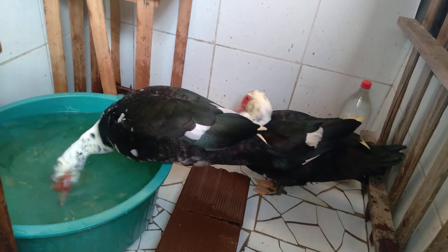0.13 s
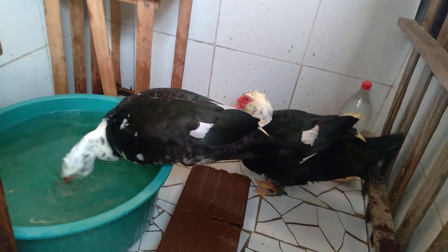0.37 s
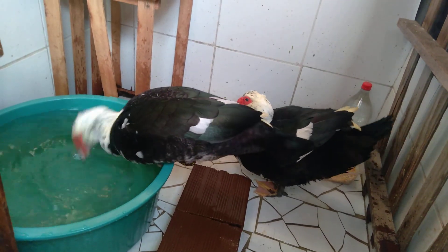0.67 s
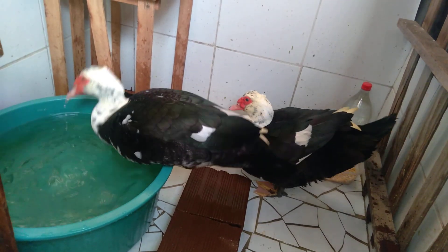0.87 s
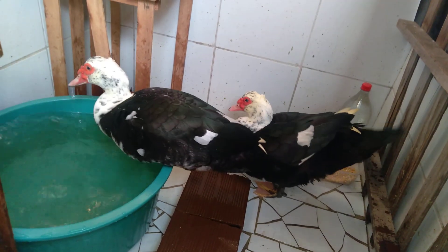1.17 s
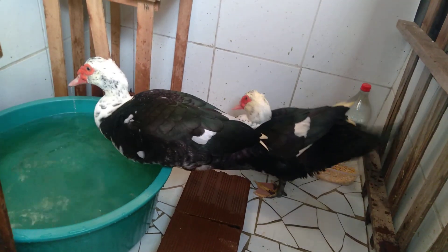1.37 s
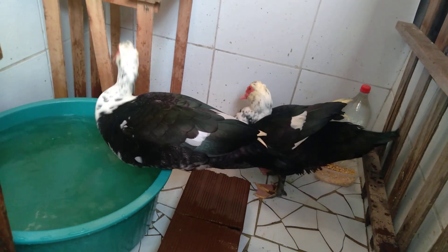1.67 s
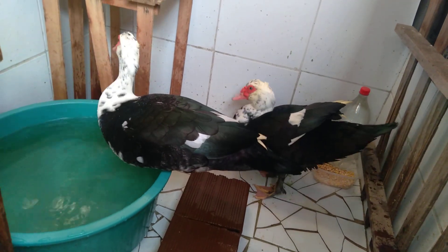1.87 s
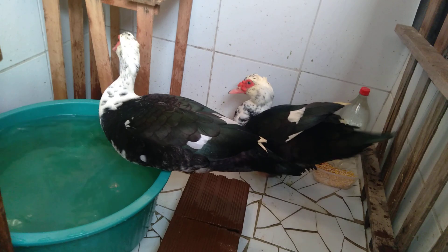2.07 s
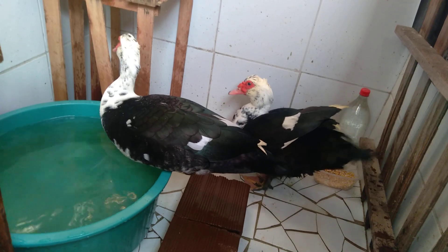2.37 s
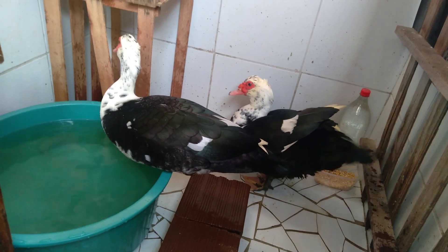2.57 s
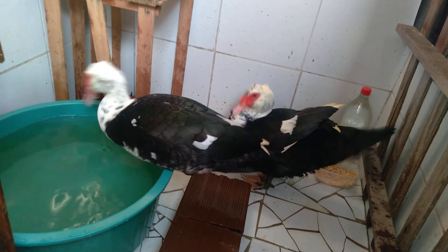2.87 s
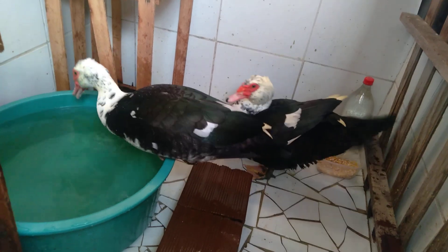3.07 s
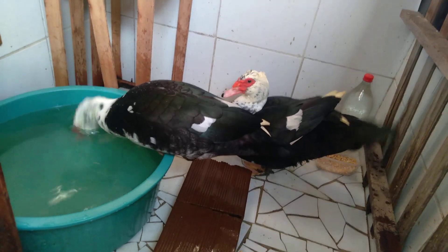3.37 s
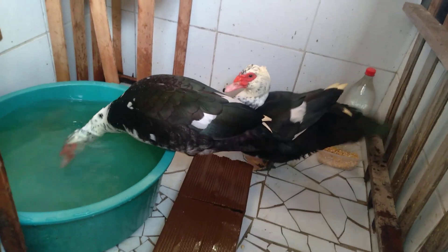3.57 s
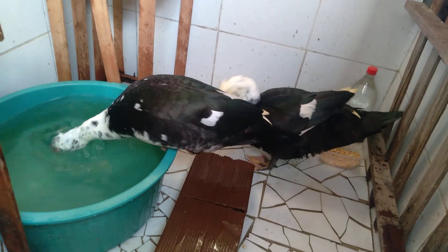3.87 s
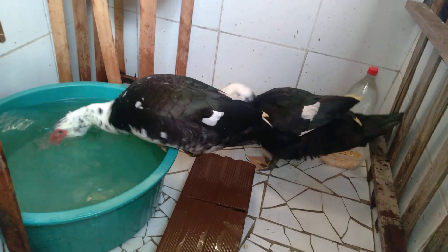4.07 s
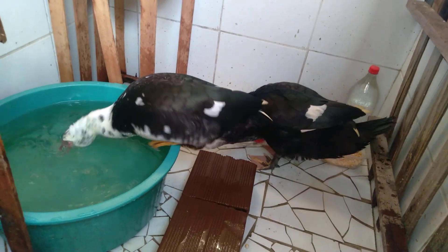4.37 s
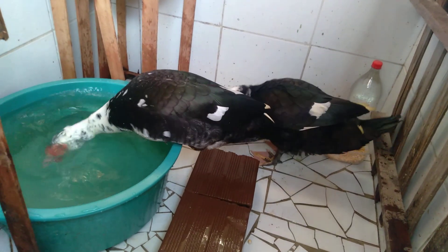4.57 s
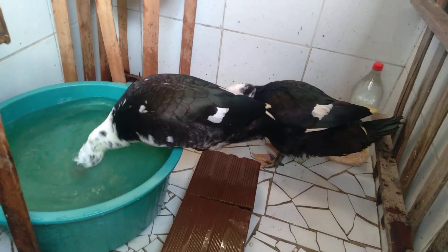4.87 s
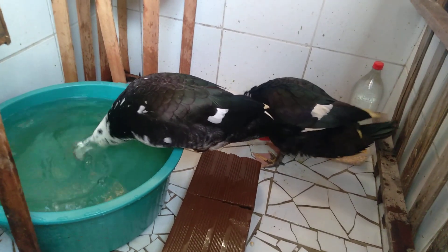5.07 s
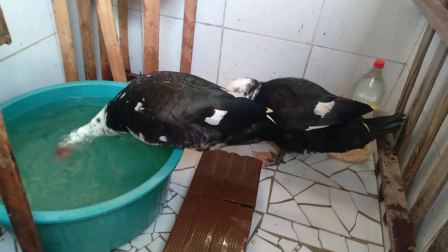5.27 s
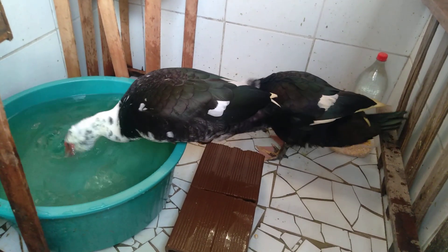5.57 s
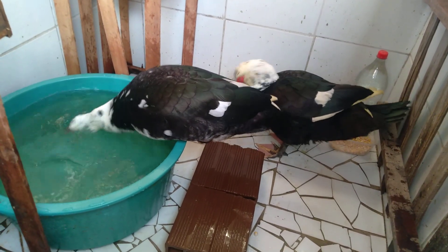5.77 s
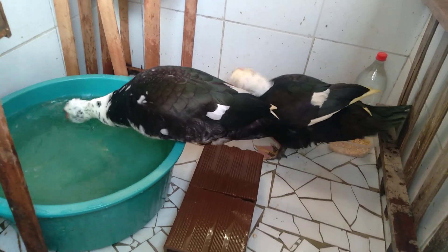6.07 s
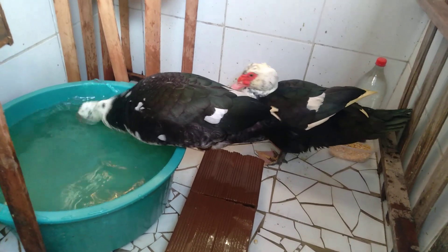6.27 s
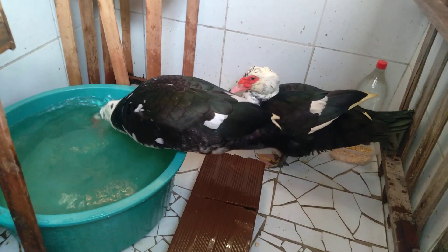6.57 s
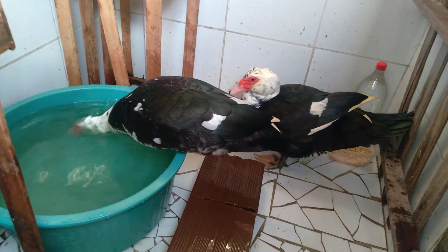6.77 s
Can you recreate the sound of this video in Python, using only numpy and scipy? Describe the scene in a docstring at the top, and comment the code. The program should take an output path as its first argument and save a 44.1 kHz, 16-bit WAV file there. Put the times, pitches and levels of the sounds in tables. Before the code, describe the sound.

A duck dabbles in a plastic tub in a small tiled corner. Sharp drips and fizzing tiny bubbles come with hoarse huffs and thin wheezes during the first three seconds. The water nearly calms, then splashes return louder and irregular until the end, with a few lower plops. Soft hollow hoots recur slowly over low rumble. Close mono sound with short tile echoes and brief level dips.

```python
"""A duck dabbles in a plastic tub of water in a small tiled corner, with hoarse huffs and thin wheezes early on.
Drops crack, ring and spray; larger bubbles ring lower, over a fizz of tiny pings and hiss.
The huffs and wheezes are shaped noise, and two late sloshes ring the tub as wavering narrow noise.
A soft hollow hoot made of three tones recurs every 1.1 to 1.4 seconds, above low room noise.
The duck and water echo off the tub and tiles, and their level dips briefly now and then."""
import sys
import numpy as np
from scipy import signal
from scipy.fft import rfft, irfft
from scipy.io import wavfile
from scipy.ndimage import map_coordinates

SR = 44100
rng = np.random.default_rng(int(sys.argv[2]) if len(sys.argv) > 2 else 0)


def transcribe(u):
    """Save the signal u as a 16-bit wav file named by the first command-line argument.

    u: samples, shape (n,) or (channels, n), limited to [-1, 1]; the rate is SR.
    q: integer samples, one column per channel.
    """
    v = np.clip(np.atleast_2d(u).T, -1, 1)
    q = np.round(v * 32767).astype(np.int16)
    wavfile.write(sys.argv[1], SR, q)


N = 305613
TIME = np.arange(N) / SR   # s


# the loudest drops and bill smacks; levels are relative, before the gains in drops():
# (time [s], level [dB], starting bubble pitch [Hz], bright splash level [dB])
LOUD_DROPS = [(0.062, -19.5, 5010, -63), (0.1118, -19.5, 4500, -54), (0.2372, -19.5, 8400, -36),
              (0.364, -23, 6220, -48), (0.841, -16, 4490, -36), (0.8637, -13.5, 4650, -39),
              (1.1286, -18.5, 4540, -41), (1.1556, -18, 11600, -45), (1.2043, -18, 8970, -27.5),
              (1.27, -24, 10100, -36), (1.3917, -17, 5040, -28.5), (1.4216, -18, 4710, -31),
              (2.0921, -26, 4500, -43.5), (2.114, -24.5, 4670, -38), (2.223, -11, 4430, -31),
              (3.5535, -23, 6750, -41), (3.6113, -20.5, 4640, -30), (3.7499, -19.5, 7860, -31.5),
              (3.8472, -7.5, 8000, -27), (3.895, -17.5, 5230, -45), (4.0415, -16, 5000, -44),
              (4.072, -9, 7630, -32), (4.1863, -8, 4290, -34), (4.2672, -12.5, 4600, -36),
              (4.3802, -18, 4690, -41), (4.6478, -25, 5420, -45), (4.814, -25.5, 4620, -34),
              (4.92, -17, 5170, -55.5), (5.0862, -5.5, 5120, -31), (5.1277, -18, 4630, -35),
              (5.1975, -12, 6470, -38), (5.236, -19.5, 4800, -33.5), (5.3037, -14.5, 4620, -49),
              (5.403, -17, 6780, -41), (5.4814, -8.5, 4800, -37.5), (5.619, -16, 8300, -33),
              (5.6694, -15, 7000, -36), (5.771, -19.5, 4440, -65), (5.808, -18, 8170, -46),
              (5.9437, -23.5, 5240, -48), (6.099, -21.5, 5300, -40), (6.132, -16.5, 5090, -37),
              (6.1802, -18, 5500, -38), (6.3356, -19.5, 4980, -33), (6.5349, -21, 4820, -40),
              (6.7473, -26, 4950, -38), (6.8139, -24, 5650, -67)]


def drops(cycles=12.7, rise_per_s=11.6, crack=0.71, crack_s=0.0004, spray_s=0.0095, spray_tail=0.25,
          spray_gain=0.066, splash_gain=0.28, droplet_splash_db=-20, level_db=-2.0,
          follower_db=-12.0, follow_s=.022):
    """Each drop cracks the surface, traps a bubble, throws a short spray and is followed by smaller droplets."""
    out, t = np.zeros(N), TIME[:2048]
    droplets = strays(per_s=10, above_db=14.5, low_hz=4276, high_hz=7450)
    droplets = [(s, db, hz, db + droplet_splash_db) for s, db, hz in droplets]
    for s, db, hz, splash_db in list(LOUD_DROPS) + droplets:
        burst = crack * np.exp(-t / crack_s) + np.exp(-t / spray_s) + spray_tail * np.exp(-t / 0.0059)
        spatter = burst * rng.standard_normal(len(t)) * from_db(4.6 * drift(t, 940))
        # the spray has little below the pitch of the main bubble
        spray = band(spatter, min(hz * 0.73, 5200), hz * 1.56, order=5)
        body = bubble(hz, cycles, rise_per_s) + spray_gain * rms_one(spray)
        add(out, s, from_db(db + level_db) * body)
        add(out, s, from_db(splash_db) * splash_gain * rms_one(band(spatter, 8200, 13700)))
        # three smaller droplets follow, weaker the later they land
        for late, higher in rng.random((3, 2)):
            follower = bubble(hz * 1.15 ** higher, cycles, rise_per_s)
            add(out, s + 0.0025 + follow_s * late, from_db(db + follower_db - 3.1 * late) * follower)
    return out


# tone colour of the fizz: (frequency [Hz], gain [dB])
FIZZ_SPECTRUM = [(880, -83), (1500, -48), (1720, -21.5), (2060, -33), (2250, -19.5), (3770, -13),
                 (4590, 0.5), (11400, -9.5), (16000, -17.5)]


def fizz(per_s=950, level_db=0.5, spread_db=7.0, cycles=46.0, rise_per_s=9.2, hiss_db=-9.0, lumps_db=3.0):
    """Countless small bubbles burst round the bill, from dry ticks to clear pings, over a lumpy hiss."""
    pings = np.zeros(N)
    draws = rng.random((9000, 5))
    happens = draws[:, 4] < per_s * TIME[-1] / len(draws)
    for when, pitch, size, damping, _ in draws[happens]:
        hz = 2700 * 5.8 ** pitch
        ringing = cycles / 16 ** damping
        loudness_db = spread_db * min(-np.log(1 - size), 3.6)
        strength = from_db(loudness_db) * hz / np.sqrt(ringing)   # short bursts start louder
        add(pings, when * TIME[-1], strength * bubble(hz, ringing, rise_per_s))
    hiss = coloured(rng.standard_normal(N), FIZZ_SPECTRUM) * from_db(hiss_db + lumps_db * drift(TIME, 89))
    return (coloured(pings, FIZZ_SPECTRUM) + hiss) * from_db(level_db + stirring_db(TIME))


# the loudest large bubbles; levels are relative, before the gain in plops():
# (time [s], level [dB], starting pitch [Hz], time to fade by 60 dB [s])
LARGE_BUBBLES = [(.111, -35, 1810, 0.1), (1.394, -20.5, 1112, 0.062), (1.47, -41, 524, 0.12),
                 (3.519, -49, 324, 0.18), (3.55, -36, 1696, 0.076), (3.795, -36.5, 1270, 0.16),
                 (3.893, -24.5, 1738, 0.095), (4.066, -32, 1675, 0.34), (4.134, -29.5, 1875, 0.13),
                 (4.187, -11, 1860, 0.031), (4.255, -21, 1187, 0.085), (4.852, -33.5, 2166, 0.11),
                 (4.969, -30.5, 2220, 0.043), (5.086, -18.5, 3010, 0.046), (5.118, -19, 3230, 0.1),
                 (5.184, -34, 1757, 0.12), (5.302, -19.5, 2123, 0.069), (5.48, -34, 1640, 0.14),
                 (6.056, -34.5, 2910, 0.17), (6.28, -37, 3200, 0.14), (6.319, -28.5, 2774, 0.14),
                 (6.653, -38, 255, .09), (6.742, -33.5, 925, 0.21), (6.813, -33, 880, 0.1),
                 (6.813, -43, 400, 0.29), (6.859, -18, 972, 0.081), (6.875, -20.5, 1784, 0.089)]


def plops(rise_per_s=2.03, churn=0.6, level_db=-9.0, small_t60_s=.07):
    """Bigger bubbles ring lower and longer, in a little churning water."""
    out, t = np.zeros(N), TIME[:8192]
    small = strays(per_s=4, above_db=-1, low_hz=1683, high_hz=3346)
    for s, db, hz, t60 in list(LARGE_BUBBLES) + [(*row, small_t60_s) for row in small]:
        tone = np.sin(2 * np.pi * hz * t * (1 + rise_per_s * t / 2))
        water = rms_one(band(rng.standard_normal(len(t)), hz, hz * 1.56))
        fade = from_db(db + level_db - 60 * t / t60)
        onset = 1 - np.exp(-t / 0.0029)
        add(out, s, fade * onset * (tone + churn * water))
    return out


# water sloshes against the tub: (time [s], length [s], level [dB])
SLOSH_EVENTS = [(5.448, 0.39, -57), (5.983, 0.16, -56)]
# hollow tones of the tub: (frequency [Hz], width [Hz], relative level [dB])
TUB_TONES = [(486, 70, 1), (973, 80, -6), (1286, 130, -8.5), (2285, 270, -11)]


def sloshes(lapping_db=3.5):
    """Each slosh swells and fades, lapping unevenly against the tub and ringing its hollow tones."""
    ringing = np.zeros(N)
    for hz, width_hz, db in TUB_TONES:
        ringing += from_db(db + lapping_db * drift(TIME, 17)) * narrow_noise(hz, width_hz)
    return swells(SLOSH_EVENTS) * ringing


# hoarse breaths; levels are relative, before the shaping in huffs():
# (time [s], attack [s], release [s], rush level [dB], throat level [dB], bright edge level [dB],
#  throat pitch [Hz])
HUFF_EVENTS = [(.373, 0.092, 0.025, -24, -52, -38, 1210), (.634, 0.082, 0.071, -18, -51.5, -32, 1260),
               (.936, 0.088, 0.073, -29, -43.5, -65, 930), (1.555, 0.11, 0.083, -32.5, -42.5, -63, 1080),
               (1.832, 0.11, 0.13, -24, -46, -60, 1180), (2.172, 0.13, 0.077, -20, -44.5, -32.5, 1270),
               (2.37, 0.19, 0.17, -50.5, -43.5, -75, 1040), (2.588, 0.057, 0.13, -30, -43.5, -46, 1107),
               (2.887, .058, 0.14, -22.5, -40, -37, 1014), (3.207, 0.11, 0.12, -19, -43, -35.5, 1260)]
# tone colour of the rushing air: (frequency [Hz], gain [dB])
HUFF_SPECTRUM = [(350, -65), (600, -20), (748, -16.5), (1390, -9.5), (1590, -12.5), (2270, -16.5),
                 (2540, -11), (4650, 0), (8390, -21), (10300, -44), (16000, -70)]


def huffs(flutter_db=2.47, beak_hz=3880, beak_db=-10.0, second_ratio=1.08, beak_width_hz=160, ends_db=19.0,
          roundness=2.03, cavity_width_hz=130, cavity_db=6.0, glide=.045, opening_db=8.0, edge_focus_db=3.0):
    """Air rushes through the opening bill: rough noise rings the beak, the throat and many small cavities."""
    out = np.zeros(N)
    for start, attack, release, level, throat, edge, throat_hz in HUFF_EVENTS:
        peak, end = start + attack, start + attack + release
        t = TIME[int(start * SR):int(end * SR)]
        stage = np.interp(t, [start, peak, end], [-1, 0, 1])
        air = rng.standard_normal(size=16384)
        # the cavities change with each posture of the head and slide as it moves
        cavities = np.geomspace(1800, 12500, num=18) * np.exp(0.036 * rng.standard_normal(size=18))
        rings = sum((-1) ** k * resonance(air, hz, cavity_width_hz) for k, hz in enumerate(cavities))
        reading_points = np.cumsum(1 + glide * drift(TIME[:len(air)], 14))
        rings = map_coordinates(rings, [reading_points], mode="mirror")
        air = rng.standard_normal(size=16384) + from_db(cavity_db) * rms_one(rings)
        air = coloured(air, HUFF_SPECTRUM)[:len(t)]
        rush = band(air, 1867, 7860, order=4)
        beak = resonance(rush, beak_hz, beak_width_hz) + resonance(rush, beak_hz * second_ratio, beak_width_hz)
        sound = from_db(level) * rms_one(rush + from_db(beak_db) * beak)
        # the throat comes through as the bill opens
        throat_air = rms_one(band(air, throat_hz * 0.79, throat_hz * 1.195, order=3))
        sound += from_db(throat + opening_db * stage) * throat_air
        # the bright edge needs the strongest flow
        edge_air = rms_one(band(rng.standard_normal(len(t)), 8540, 11400))
        sound += from_db(edge - edge_focus_db * stage ** 2) * edge_air
        ends = np.clip(np.minimum(t - t[0], t[-1] - t) / 0.015, 0, 1)
        shape_db = -3.0 - ends_db * np.abs(stage) ** roundness + flutter_db * drift(t, 130)
        add(out, start, sound * ends * from_db(shape_db))
    return out


# thin wheezes of the duck: (time [s], length [s], level [dB])
WHEEZE_EVENTS = [(.235, 0.098, -43.5), (.482, 0.23, -48.5), (1.128, 0.13, -48.5)]


def wheezes():
    """Air squeezes through the nearly closed bill and becomes a narrow, wavering hiss."""
    return swells(WHEEZE_EVENTS) * narrow_noise(hz=3604, width_hz=660)


# hoots: (time [s], low tone level [dB], main tone level [dB], upper tone level [dB])
HOOT_EVENTS = [(1.349, -31.5, -25.5, -45.5), (2.532, -35.5, -42, -33), (3.904, -32, -23, -40),
               (5.043, -35, -26, -47.5), (6.398, -29.5, -25, -58)]
# the low, main and upper tone of every hoot: (centre pitch [Hz], delay [s], length [s])
HOOT_PARTS = [(206, .003, .062), (865, 0.0, .052), (1790, 0.0, .045)]


def hoots(linger_db=-11.5, linger_t60=0.26, waver=0.013):
    """Three unrelated tones swell and fade almost together, then linger unevenly between the walls."""
    out, t = np.zeros(N), TIME[:16384]
    for s, *levels in HOOT_EVENTS:
        for db, (hz, delay, length) in zip(levels, HOOT_PARTS):
            progress = np.minimum(t / length, 1)
            swell = np.sin(np.pi * progress) ** 2
            phase = 2 * np.pi * np.cumsum(hz * (1 + waver * drift(t, 113))) / SR
            echo = drift(t, 78.6) * np.sin(phase) + drift(t, 71.8) * np.cos(phase)
            echo *= progress ** 2 * from_db(linger_db - 60 * np.maximum(t - length, 0) / linger_t60)
            add(out, s + delay, from_db(db) * (swell * np.sin(phase) + echo))
    return out


def tiled_corner(x, wall_s=.0024, wall_gain=0.22, near_db=-4.0, near_t60=0.075, room_db=-8.5, room_t60=0.37):
    """An echo off the tub wall, a quick cluster off the near tiles, then the dull tail of the room."""
    t = TIME[:22050]
    response = np.zeros(len(t))
    response[0] = 1   # the direct sound
    add(response, wall_s, np.array([wall_gain]))
    for db, t60, top_hz in [(near_db, near_t60, 13000), (room_db, room_t60, 8000)]:
        tail = band(rng.standard_normal(len(t)), 73, top_hz, order=1)
        tail *= from_db(-60 * t / t60) * (t > .003)
        response += from_db(db) * tail / np.sqrt(np.sum(tail ** 2))
    return signal.fftconvolve(x, response)[:N]


# brief drops in level: (start time [s], end time [s], change in level [dB])
LEVEL_DIPS = [(.217, .239, -16), (.349, .366, -11.5), (1.803, 1.834, -11), (2.83, 2.896, -14.5),
              (4.69, 4.806, -24.5), (5.035, 5.06, -11), (5.912, 5.943, -18.5), (5.983, 6.049, -7.5),
              (6.696, 6.73, -12), (6.78, 6.808, -8), (6.835, 6.856, -10.5)]


def dips(edge_s=.0053):
    """A gain that dips briefly, with short sloping edges."""
    total_db = np.zeros(N)
    for start, end, db in LEVEL_DIPS:
        total_db += db * np.clip(np.minimum(TIME - start, end - TIME) / edge_s, 0, 1)
    return from_db(total_db)


# tone colour of the room noise: (frequency [Hz], gain [dB])
ROOM_SPECTRUM = [(15, -25), (25, -20.5), (124, 1), (267, -14), (350, -10.5), (425, -17.5), (649, -14.5),
                 (1490, -22), (2270, -23), (2500, -24), (3250, -39), (5500, -120)]


def rumble(level_db=-63.0, wander_db=4.0, boom_hz=57, boom_width_hz=12, boom_db=-64.0):
    """Low room noise that wanders in level, with one deep room resonance."""
    noise = from_db(level_db + wander_db * drift(TIME, 11)) * coloured(rng.standard_normal(N), ROOM_SPECTRUM)
    boom = rms_one(resonance(rng.standard_normal(N), boom_hz, boom_width_hz))
    return noise + from_db(boom_db) * boom


# how hard the water is stirred, as a base level for fizz and stray bubbles: (time [s], level [dB])
STIRRING_LEVEL = [(0.0, -43), (.55, -55.5), (.9, -41), (1.26, -53.5), (1.41, -43), (1.64, -49.5),
                  (1.8, -79), (2.35, -59.5), (3.1, -56.5), (3.48, -46), (3.77, -46.5), (3.97, -59),
                  (4.1, -36.5), (4.42, -46.5), (4.52, -38.5), (4.66, -50.5), (4.86, -41), (5.02, -53.5),
                  (5.12, -37.5), (5.3, -46.5), (6.0, -52), (6.13, -42.5), (6.28, -46.5), (6.57, -43),
                  (6.93, -61)]


def stirring_db(s):
    """How hard the water is stirred at time s."""
    return np.interp(s, *np.transpose(STIRRING_LEVEL))


def strays(per_s, above_db, low_hz, high_hz, spread_db=2):
    """Chance events, louder where the water is stirred harder: rows (time [s], level [dB], pitch [Hz])."""
    when, pitch, size, chance = rng.random((300, 4)).T
    s = when * TIME[-1]
    db = stirring_db(s) + above_db + spread_db * (2 * size - 1)
    rows = np.transpose([s, db, low_hz * (high_hz / low_hz) ** pitch])
    return list(rows[chance < per_s * TIME[-1] / len(s)])


def bubble(hz, cycles, rise_per_s):
    """A trapped bubble rings for some cycles, rising in pitch as it nears the surface."""
    t = TIME[:2048]
    tone = np.sin(2 * np.pi * hz * t * (1 + rise_per_s * t / 2))
    return tone * np.exp(-t * hz / cycles) * (1 - np.exp(-t * hz))


def swells(rows):
    """A gain that rises and falls once for each row of (time [s], length [s], level [dB])."""
    return sum(from_db(db) * np.sin(np.pi * np.clip((TIME - s) / length, 0, 1)) for s, length, db in rows)


def narrow_noise(hz, width_hz, waver=0.038):
    """A breathy resonance whose centre wanders; its rms (average strength) is 1."""
    phase = 2 * np.pi * np.cumsum(hz * (1 + waver * drift(TIME, 11))) / SR
    return rms_one(drift(TIME, width_hz) * np.sin(phase) + drift(TIME, width_hz) * np.cos(phase))


def drift(t, per_s):
    """Random values around 0 with spread 1, joined by straight lines, per_s of them a second."""
    knots = rng.standard_normal(size=4096)
    return np.interp(t * per_s, np.arange(len(knots)), knots)


def resonance(x, hz, width_hz):
    """Two-pole resonance that rings near one pitch, with gain 1 on top."""
    r = np.exp(-np.pi * width_hz / SR)
    feedback = [1, -2 * r * np.cos(2 * np.pi * hz / SR), r * r]
    return signal.lfilter(np.array([1, 0, -1]) * (1 - r * r) / 2, feedback, x + 1e-18)


def coloured(x, spectrum):
    """Give a sound a tone colour from rows (frequency [Hz], gain [dB]); rms 1."""
    hz, db = np.transpose(spectrum)
    bins = np.maximum(np.arange(len(x) // 2 + 1) * SR / len(x), 1)
    gain = from_db(np.interp(np.log(bins), np.log(hz), db))
    return rms_one(irfft(rfft(x) * gain, len(x)))


def band(x, low_hz, high_hz, order=2):
    """Keep mainly the pitches between two limits."""
    return signal.sosfilt(signal.butter(order, [low_hz, high_hz], "band", fs=SR, output="sos"), x)


def add(out, s, sound):
    """Mix a sound in at time s."""
    at = max(int(s * SR), 0)
    out[at:at + len(sound)] += sound[:max(len(out) - at, 0)]


def rms_one(x):
    """Scale a sound to an rms of 1."""
    return x / np.sqrt(np.mean(x ** 2) + 1e-20)


def from_db(db):
    """Turn decibels into a gain."""
    return 10 ** (np.asarray(db) / 20)


def scene(rumble_dip=0.54):
    """Duck and water in their corner, with hoots and a low room rumble, the same in both channels."""
    duck = tiled_corner(drops() + fizz() + plops() + sloshes() + huffs() + wheezes())
    level = dips()
    # the rumble dips less deeply, and the hoots do not dip
    mono = duck * level + hoots() + rumble() * level ** rumble_dip
    return np.array([mono, mono])


def record(dry, cutoff_hz=16300):
    """The top is cut steeply."""
    return signal.sosfilt(signal.ellip(10, .1, 80, cutoff_hz, fs=SR, output="sos"), dry)


dry = scene()
out = record(dry)
transcribe(out)
```